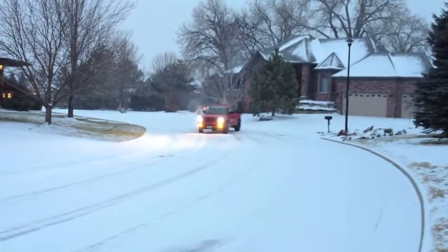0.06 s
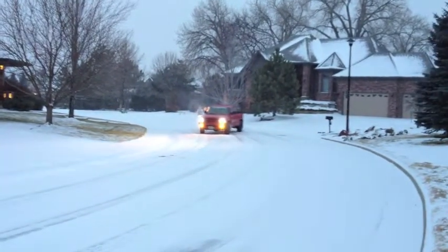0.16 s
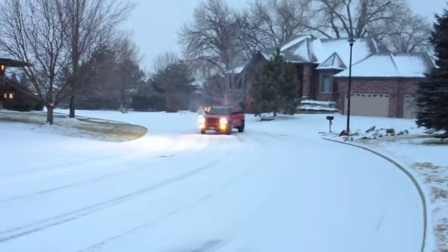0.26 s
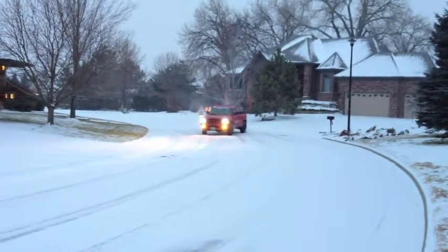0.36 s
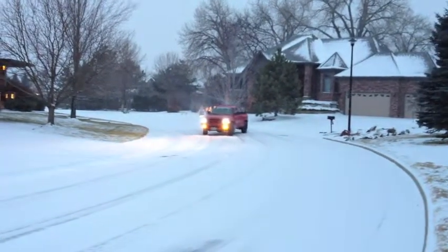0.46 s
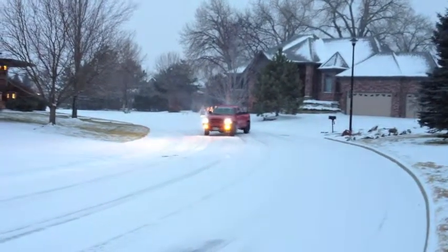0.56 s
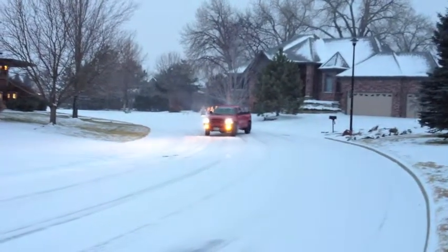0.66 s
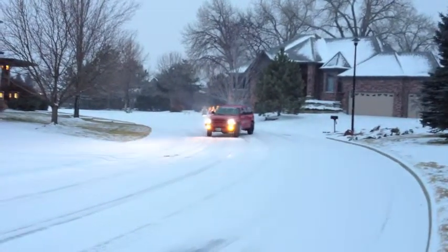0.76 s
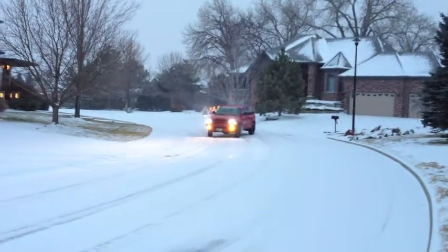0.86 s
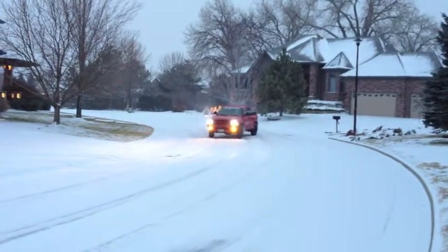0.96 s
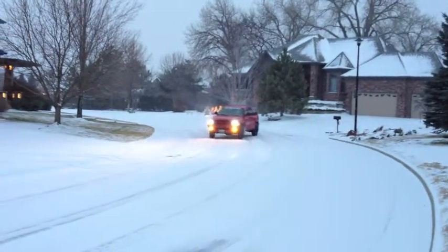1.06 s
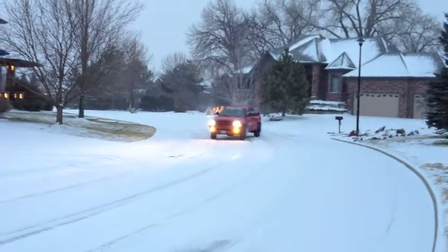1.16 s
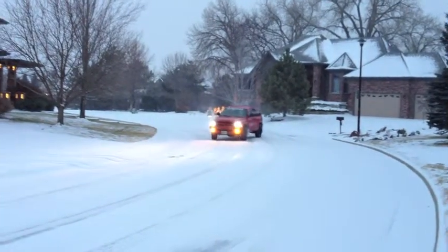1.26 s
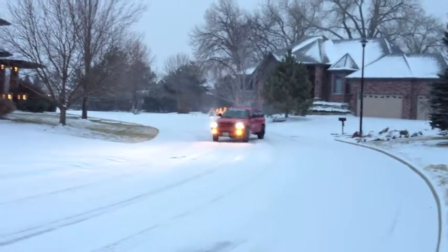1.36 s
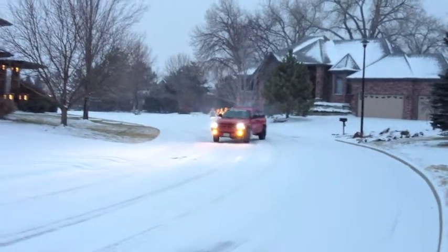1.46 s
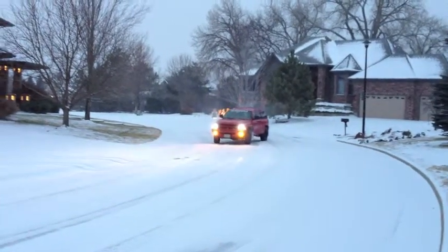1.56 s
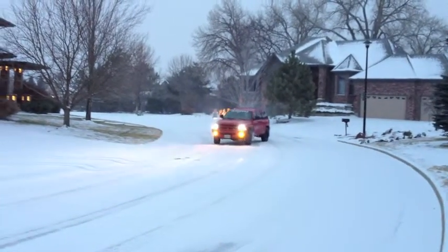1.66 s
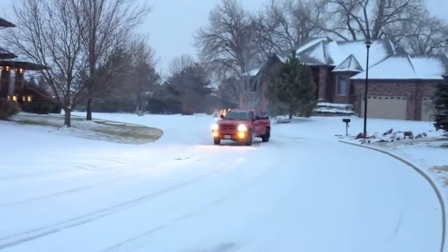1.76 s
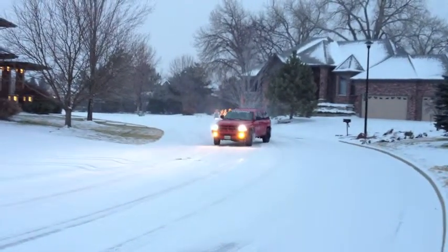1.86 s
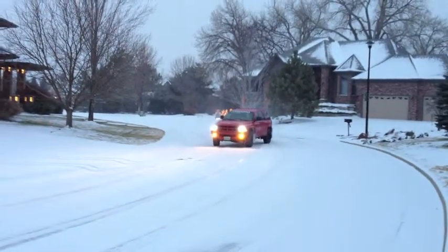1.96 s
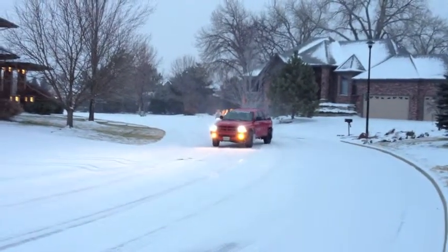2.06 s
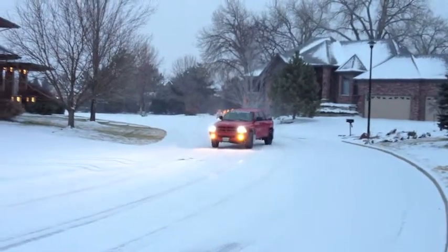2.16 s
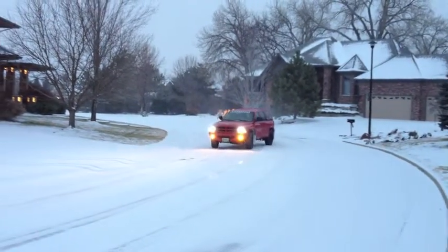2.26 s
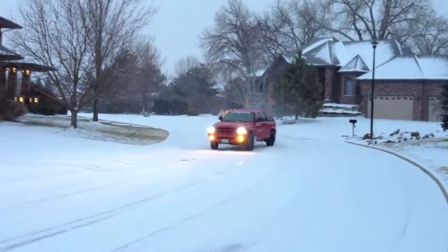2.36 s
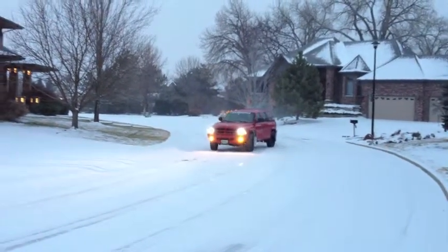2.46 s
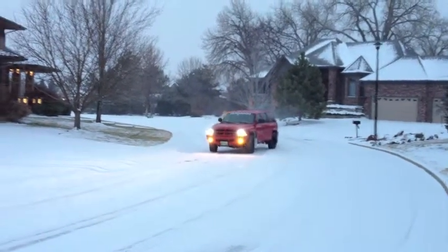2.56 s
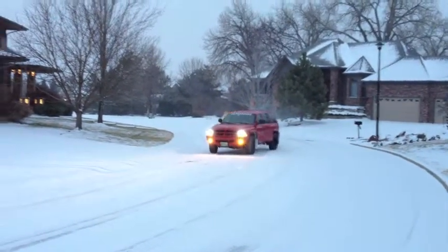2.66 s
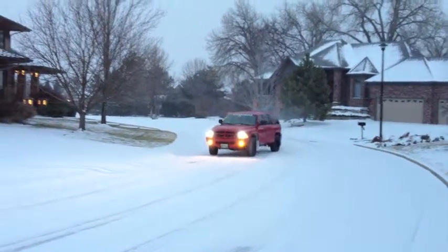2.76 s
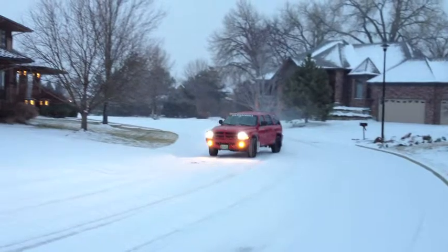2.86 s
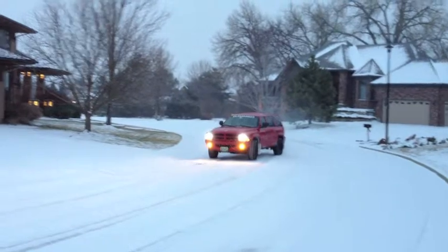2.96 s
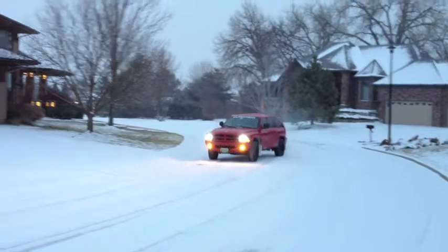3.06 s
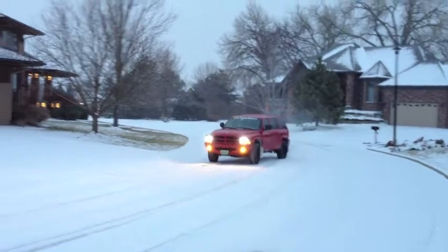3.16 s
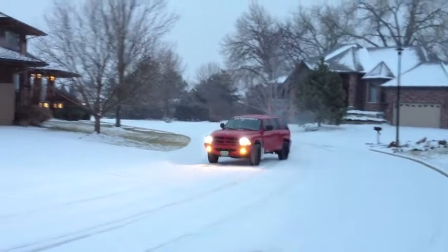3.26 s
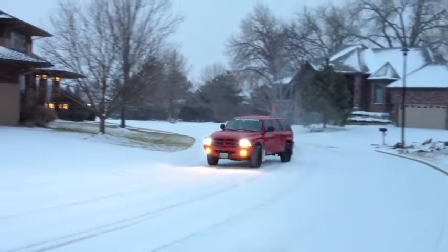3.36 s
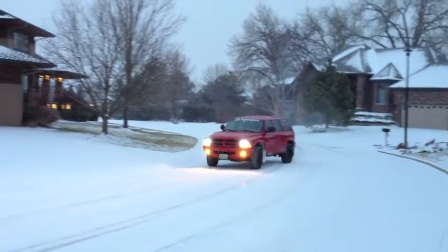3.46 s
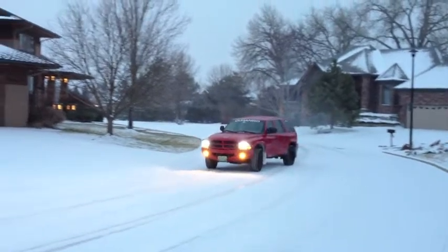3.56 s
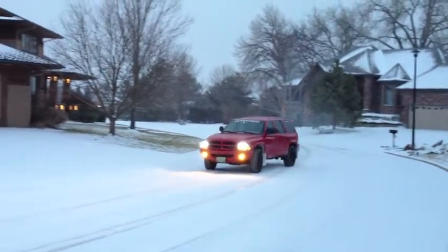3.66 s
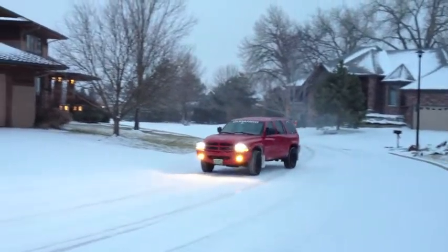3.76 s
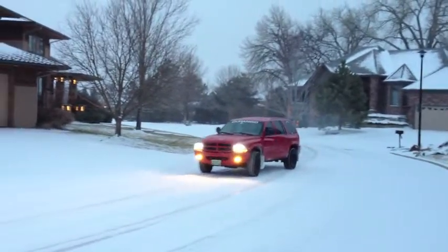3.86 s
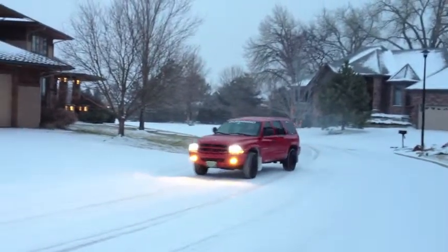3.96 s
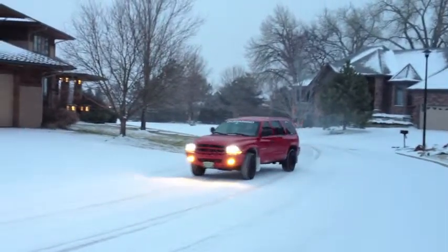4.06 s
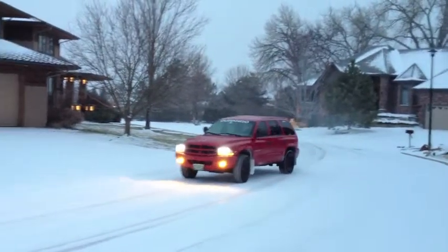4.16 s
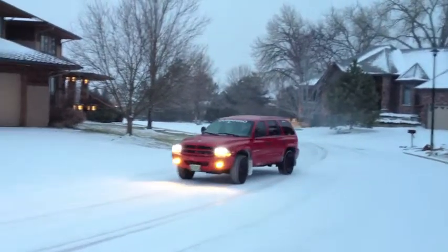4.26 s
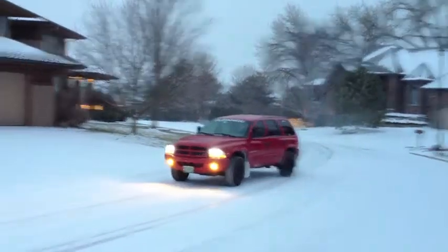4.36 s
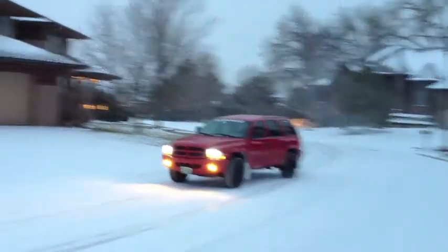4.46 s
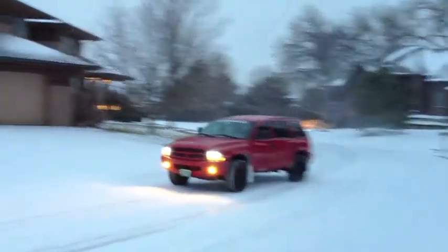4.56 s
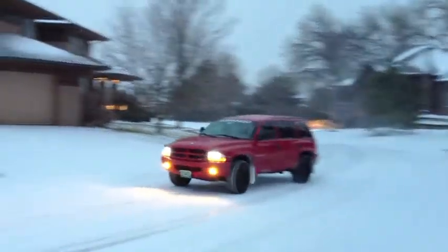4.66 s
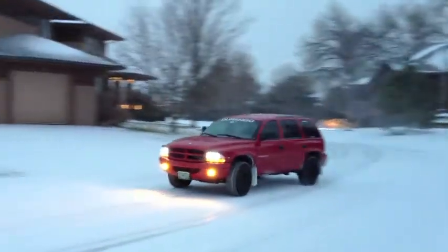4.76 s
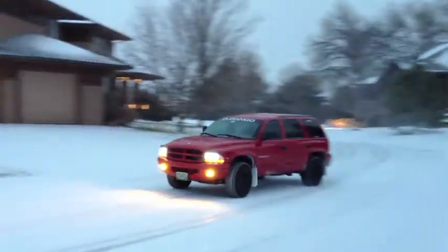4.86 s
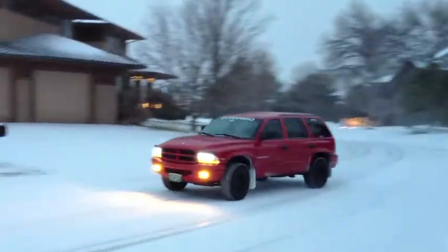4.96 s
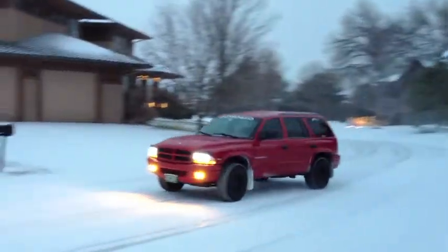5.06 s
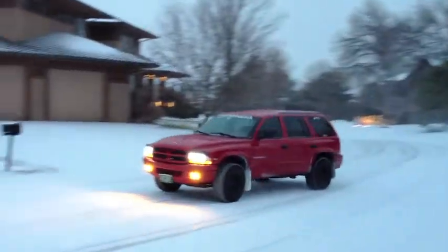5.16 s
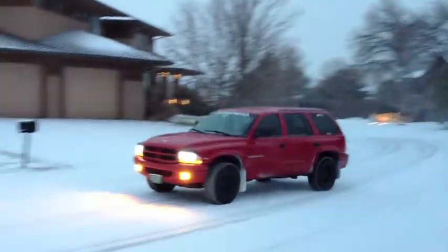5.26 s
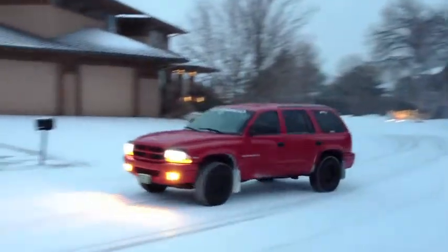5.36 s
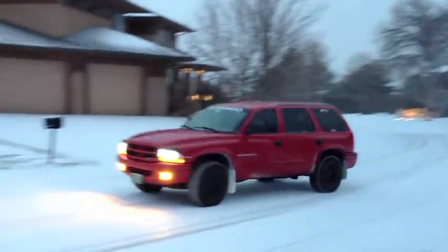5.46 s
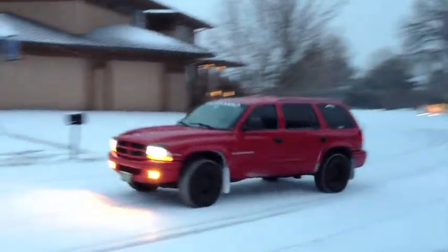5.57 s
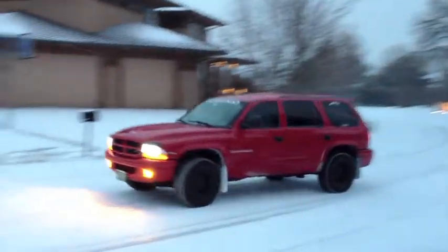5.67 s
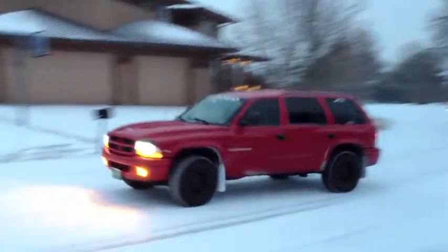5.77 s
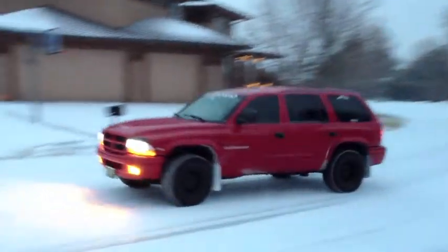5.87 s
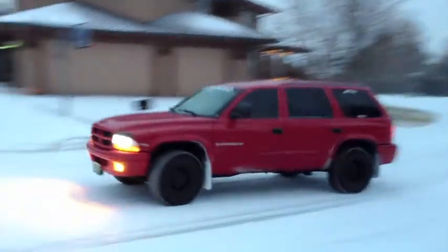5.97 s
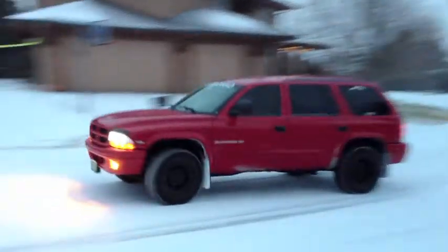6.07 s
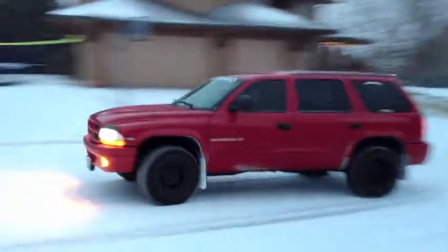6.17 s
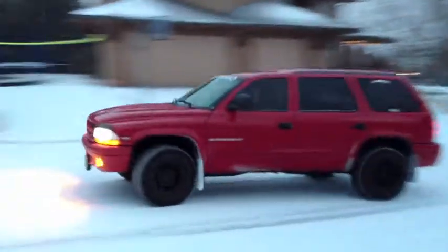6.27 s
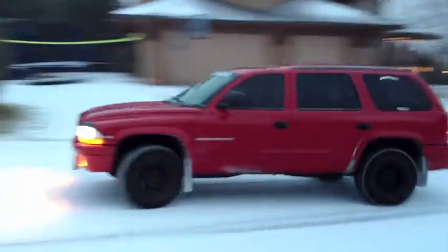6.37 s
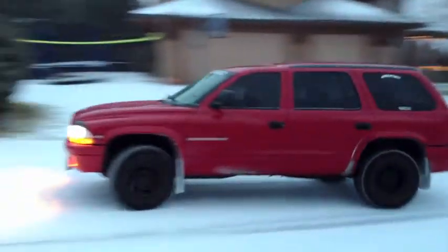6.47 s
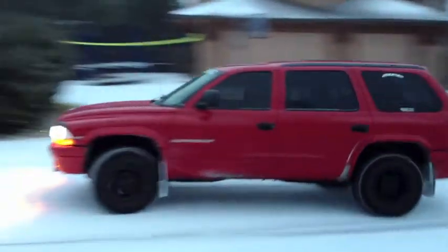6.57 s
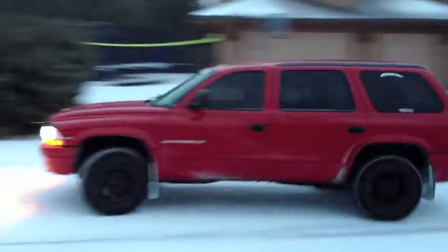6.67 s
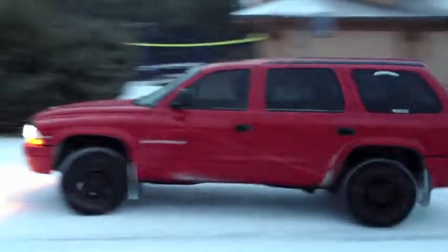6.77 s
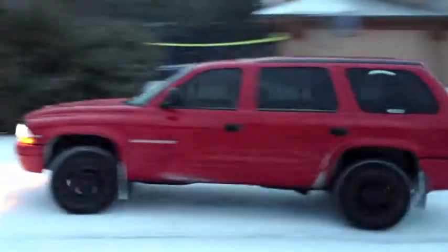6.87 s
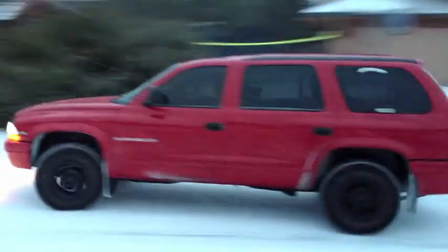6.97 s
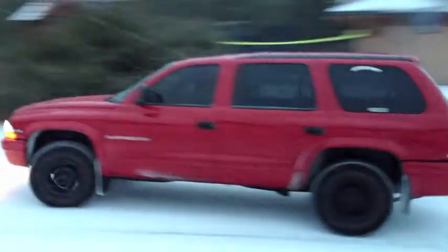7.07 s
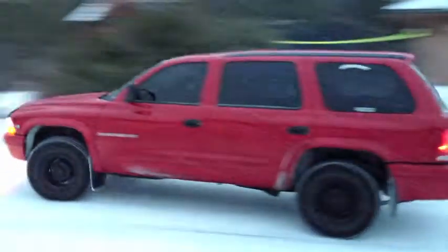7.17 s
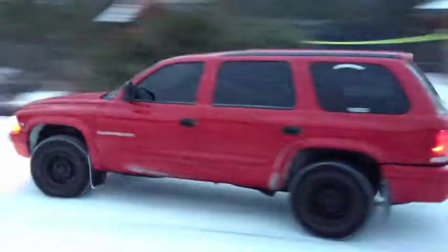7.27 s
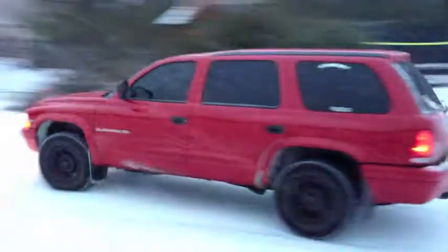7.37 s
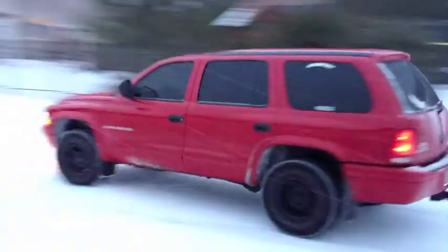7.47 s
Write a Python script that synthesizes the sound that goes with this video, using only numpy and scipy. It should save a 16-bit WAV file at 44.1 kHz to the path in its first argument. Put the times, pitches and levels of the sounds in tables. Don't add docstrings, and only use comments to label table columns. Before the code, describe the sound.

Outdoors on a quiet snowy street, a deep V8 rumble idles in from afar, single notes fading in and out off house fronts. It grows steadily, revs barely changing, as snow crunches and hisses beneath the tyres. At closest range the exhaust becomes rough, thick and lumpy with short sliding surges, slightly saturating the small handheld microphone, and it is still loud at the cut.

```python
import sys
import numpy as np
from scipy import signal
from scipy.io import wavfile

SR = 44100
rng = np.random.default_rng(int(sys.argv[2]) if len(sys.argv) > 2 else 0)


def pcm_store(signal):
    levels = np.round(np.clip(np.atleast_2d(signal), -1, 1) * 32767)
    wavfile.write(sys.argv[1], SR, levels.astype(np.int16).T)


def how_loud(loudness_db):
    steps = np.asarray(loudness_db, float) / 20
    return 10 ** steps


N = 332073
STEP = 32

# time_s, near_share (0-1)
NEARNESS = [(0, 0.1), (3.2, 0.12), (5, 0.51), (6.2, .95), (7.53, 0.94)]
# time_s, wheels_gain_db (wheels and bonnet come near), tailpipe_gain_db (it swings into view)
PASSING = [(0.0, 0, -0.5), (0.3, -0.8, 1.5), (0.9, -0.7, 0.5), (1.5, 2, 0.5), (2.2, 2, 1), (2.7, 3.5, 3),
           (3.1, 6.4, 0.5), (3.5, 7, 5), (3.8, 9, 9), (4.1, 10, 7.5), (5.1, 11, 8.5), (5.7, 13, 12),
           (5.95, 15, 14.5), (6.4, 17, 14.5), (6.65, 17.5, 19.5), (6.9, 17, 24), (7.3, 17, 25.5),
           (7.53, 16.5, 24)]


def rms_one(x):
    return x / np.sqrt(np.mean(x ** 2) + 1e-20)


def in_time(rows):
    time_s, *columns = np.transpose(rows)
    return [np.interp(np.arange(N) / SR, time_s, column) for column in columns]


def fine(slow):
    return np.interp(np.arange(N) / STEP, np.arange(len(slow)), slow)


def away(s, width):
    return (np.arange(0, N + STEP, STEP) / SR - s) / max(width, 1e-3)


def drift(rate):
    pole = np.exp(-2 * np.pi * STEP * rate / SR)
    settle = 2000
    noise = rng.standard_normal(N // STEP + settle + 2)
    slow = signal.lfilter([1], [1, -2 * pole, pole * pole], noise)
    return rms_one(slow[settle:])


def flicker(spread_db, rate):
    return fine(how_loud(spread_db * drift(rate)))


def resonate(x, hz, width_hz):
    radius = np.exp(-np.pi * width_hz / SR)
    gain = (1 - radius * radius) / 2
    section = [gain, 0, -gain, 1, -2 * radius * np.cos(2 * np.pi * hz / SR), radius * radius]
    return signal.sosfilt([section] * 2, x)


def body(x, modes, patchy_db, rate):
    rings = []
    for k, (hz, width_hz, *_) in enumerate(modes):
        sign = (-1) ** k
        rings.append(sign * flicker(patchy_db, rate) * resonate(x, hz, 1.47 * width_hz))
    far_db, near_db = np.transpose(modes)[2:]
    far = rms_one(how_loud(far_db) @ np.array(rings))
    near = rms_one(how_loud(near_db) @ np.array(rings))
    share = np.clip(in_time(NEARNESS)[0], 0, 1)
    return (1 - share) * far + share * near


def layers():
    # far_db, wheels_share, tailpipe_share (shares of the two passing gains)
    mix = [
        (-40.5, 0.51, 0.0076),
        (-49.5, 1.074, 0.078),
        (-55.5, 0.036, 1.15),
        (-47, 0.035, 1.04),
        (-52, .3, 0.66),
        (-54, 0.49, 0.29),
        (-68, 1.11, 0.027),
        (-65.5, .9, -0.14),
        (-67.5, 1.067, -0.097),
    ]
    # far_db, wheels_share, tailpipe_share
    lope = (-55.5, 1.9, -.45)
    # far_db, wheels_share, tailpipe_share
    twelfth = (-51, 0.12, .1)
    wheels_db, tailpipe_db = in_time(PASSING)
    return [far_db + wheels * wheels_db + tail * tailpipe_db for far_db, wheels, tail in mix + [lope, twelfth]]


def tones(firings, levels_db):
    orders = [(8, 0, 0.5, 0.6), (13, 2, -0.8, 0.6), (16, 1, .4, .9), (5, 2, -18, 2), (7, 0, -16, 2.5),
              (15, 4, -.5, 1.0), (14, 4, -12, 2), (18, 4, -11, 3), (23, 4, -13, 3), (9, 1, -22, 3.5),
              (24, 5, -0.2, 1.5), (21, 3, 0.7, -0.7), (22, 2, -10, 1.5)]
    strong_firing_s = 6.345
    scatter_rad, pipe_lag_rad = 0.7, 1.0
    cycle = 2 * np.pi * (firings - firings[round(strong_firing_s * SR)]) / 8
    gains = how_loud(np.array(levels_db))
    out = np.zeros(N)
    for order, curve, db, wander_db in orders:
        phase = scatter_rad * rng.uniform(-1.2, 1) - pipe_lag_rad
        level = np.sqrt(2) * how_loud(db) * gains[round(curve)] * flicker(wander_db, 3.0)
        out += level * np.cos(round(order) * cycle + phase)
    return out


def faded(levels_db):
    # time_s, curve (index in levels_db, rounded), half_width_s, left_db
    notches = [(.92, 3, 0.044, -12), (1.26, -0.5, .07, -6.5), (6.933, 3, 0.2, -6.5), (3.1, 0, 0.074, -6),
               (3.459, 0, .12, -16), (3.87, 0, 0.14, -14.5), (4.38, 0, .12, -20), (4.94, 0, .16, -23),
               (5.17, 0, 0.11, -27), (1.59, 0, .04, -9), (6.76, -0.5, 0.084, -3.5),
               (7.38, -0.5, 0.037, -11), (.2, 5, .5, -8.5), (1.14, 1, 0.17, -4), (1.68, 2, 0.13, -11),
               (2.73, 1, 0.16, -5.5), (3.14, 1, .1, -9), (3.948, 1, 0.56, -6), (4.604, 1.5, .2, -2.5),
               (5.62, 1, 0.26, -5), (6.84, 1, .5, -5), (7.508, 1.5, .25, -14.5), (.77, 2, 0.21, -6),
               (2.702, 2, 0.34, -8), (6.62, 2, 0.12, -1.5), (6.92, 2, .08, -3), (5.03, 3, .12, -10.5),
               (6.254, 3, 0.28, -10), (3.75, 3, .2, -6.5), (5.653, 3, 0.34, -9.5)]
    loss_db = np.zeros((len(levels_db), len(away(0, 1))))
    for s, curve, width, left_db in notches:
        left = min(how_loud(left_db), 1)
        power = left ** 2 + (1 - left ** 2) * np.tanh(away(s, width)) ** 2
        loss_db[round(curve)] += 10 * np.log10(power)
    return [db + fine(loss) for db, loss in zip(levels_db, loss_db)]


def uneven(firings):
    at = np.flatnonzero(np.diff(np.floor(firings)) > 0)
    kicks = np.zeros(N)
    kicks[at] = rng.standard_normal(len(at))
    return rms_one(kicks)


def puffs(firings, puffs_db):
    # centre_hz, width_hz, far_db, near_db
    pipe_modes = [(77.7, 22, -0.5, -6), (92, 28.4, 0.5, -0.1), (127.5, 30.4, -1, -8),
                  (157.6, 24.8, -4.5, -3), (191.8, 28, -7, -9), (222, 34, -18, -13.5)]
    drive = uneven(firings) + 0.69 * rng.standard_normal(N)
    burble = body(drive, pipe_modes, patchy_db=1.5, rate=4.0)
    return how_loud(puffs_db - 1.2 * in_time(NEARNESS)[0]) * burble


def surges():
    # middle_s, peak_db, from_hz, to_hz, length_s
    glides = [(3.72, -26, 137, 105, .07), (4.21, -33, 187, 170.1, 0.062), (4.4, -42, 365.6, 360.6, 1.2),
              (5.03, -37.5, 300, 300, 0.17), (6.52, -27.5, 239.8, 223, 0.062),
              (6.745, -18.5, 181, 169.7, .06), (6.82, -13, 119, 92, .1), (7.01, -27, 353.7, 370, 0.11),
              (7.13, -15, 151, 120, 0.057), (7.13, -20, 250, 230, .035), (7.37, -13.5, 75.4, 106, .15),
              (7.375, -21.5, 240, 217, .12)]
    out = np.zeros(N)
    for s, peak_db, from_hz, to_hz, length_s in glides:
        size = round(length_s * SR)
        turns = np.cumsum(np.linspace(from_hz, to_hz, size)) / SR
        note = np.sin(2 * np.pi * turns + rng.uniform(0, 2 * np.pi))
        out[round(s * SR) - size // 2:][:size] += how_loud(peak_db) * np.hanning(size) * note
    return out


def bay(firings, drone_db, roar_db):
    # centre_hz, width_hz, far_db, near_db
    drone_modes = [(250, 45, -4, -6), (300, 28.5, 0.3, 0.2), (330.6, 30, 0, -3), (372.4, 37, -0.9, 1.1),
                   (432, 65, -5, -4), (504, 70, -9, -7.5), (586, 78, -13, -12)]
    roar_modes = [(651, 110, 0.2, -6.5), (804, 170, -1.6, 0.4), (960, 170, -4.5, -1.5), (1101, 138, 2, 0.8),
                  (1256, 178, -8, -2.5), (1491, 222, -7.5, -5.5)]
    breath = 1 + 0.048 * np.cos(2 * np.pi * firings)
    drone_drive = breath * rng.standard_normal(N) + 0.55 * uneven(firings)
    drone = body(drone_drive, drone_modes, patchy_db=0.82, rate=3.0)
    roar = body(breath * rng.standard_normal(N), roar_modes, patchy_db=1.14, rate=4.6)
    return how_loud(drone_db) * drone + how_loud(roar_db) * roar


def grains(per_s, spread_db, smooth):
    sizes = how_loud(spread_db * np.minimum(rng.exponential(1, N), 4)) * rng.choice([-1, 1], N)
    clicks = sizes * (rng.random(N) < per_s / SR)
    return rms_one(clicks) + smooth * rng.standard_normal(N)


def snow(tread_db, crunch_db, powder_db):
    # centre_hz, width_hz, far_db, near_db
    tread_modes = [(1714, 240, -0.8, 0.2), (2020, 200, -7.5, 1.5), (2230, 130, 3, -1.5),
                   (2450, 250, -9, -5)]
    crunch_modes = [(2708, 180, 0, -3), (2977, 260, 0.7, 0.6), (3307, 280, -6, -0.5)]
    powder_modes = [(3566, 300, -3, 1.6), (4097, 260, -1.5, -0.5), (4420, 250, -9.5, -2),
                    (4875, 450, 1.1, -1), (5440, 500, -4, -2.5), (6030, 590, -0.5, 0.1),
                    (6840, 700, -4.5, -7.5), (7500, 450, -8, -10.5)]
    # time_s, extra_db
    packing = [(.14, 5), (0.769, 5), (.9, 3), (1.05, 4), (1.17, 2), (1.55, 1), (1.64, 3.5), (1.82, 3.5),
               (2.45, 2), (2.87, 8), (2.98, 6), (3.25, 7.5), (3.52, 7.5), (3.67, 6), (3.77, 7), (3.92, 4),
               (4.03, 3.5), (5.09, 3), (5.41, 5), (5.62, 4.5), (6.19, -1.5), (6.29, 2.5), (6.38, 2.5),
               (6.56, 1), (6.635, 4.5), (6.7, 6), (6.8, 3.5), (7.3, 5), (7.49, 4.5)]
    patch_s = 0.023
    spray_from_s, spray_to_s, spray_edge_s, spray_db = 6.585, 6.825, 0.012, 4.0

    clumps = flicker(0.8, 14.0)
    crunch = body(clumps * grains(1200, 3.4, smooth=1.5), crunch_modes, patchy_db=1.0, rate=20.0)
    powder = body(clumps * grains(3000, 2.2, smooth=1.3), powder_modes, patchy_db=0.5, rate=7.4)
    tread = body(clumps * grains(2000, 3.0, smooth=1.6), tread_modes, patchy_db=0.76, rate=8.9)
    patches_db = sum(db * np.exp(-away(s, patch_s) ** 2) for s, db in packing)
    spray = (np.tanh(away(spray_from_s, spray_edge_s)) - np.tanh(away(spray_to_s, spray_edge_s))) / 2
    out = how_loud(crunch_db + fine(patches_db)) * crunch
    out += how_loud(powder_db + spray_db * fine(spray)) * powder
    return out + how_loud(tread_db - 0.73) * tread


def squeak():
    # time_s, peak_db, half_length_s
    patches = [(2.86, -76, .03), (2.99, -72, .05), (3.11, -69, 0.078), (3.26, -65, .045), (3.41, -65, .045),
               (3.518, -69, .06), (3.6, -74, .05), (3.76, -74, .05)]
    band = rms_one(resonate(rng.standard_normal(N), 4120, 160))
    swell = sum(how_loud(db) * np.exp(-away(s, half_s) ** 2) for s, db, half_s in patches)
    return band * flicker(3.0, 40.0) * fine(swell)


def ticks():
    # time_s, peak_db, centre_hz, width_hz
    snaps = [(0.029, -39, 4300, 3500), (0.0344, -43.5, 5800, 3000), (1.9812, -41, 3000, 1420),
             (2.2140, -40.5, 2900, 3007), (2.215, -44, 1900, 400), (2.2216, -48, 7200, 1180),
             (5.803, -31, 6400, 2780), (6.5602, -21, 3200, 5000), (6.6184, -31, 2100, 900),
             (6.6790, -28, 2200, 1000), (6.68, -32, 5900, 1200), (6.591, -38, 3100, 500),
             (6.626, -35, 3100, 500)]
    out = np.zeros(N)
    for s, peak_db, hz, width_hz in snaps:
        snap = resonate(signal.unit_impulse(400), hz, width_hz)
        out[round(s * SR):][:400] -= how_loud(peak_db) * snap / np.abs(snap).max()
    return out


def rumble():
    hum = rms_one(resonate(rng.standard_normal(N), 50, 22))
    return how_loud(-56 + 0.55 * in_time(PASSING)[1]) * hum


def scene():
    # time_s, firing_rate_hz
    speed = [(0.0, 64.5), (0.6, 59.7), (0.95, 59.0), (1.5, 59.4), (2.1, 60.3), (2.7, 62.2), (3.2, 63.4),
             (3.85, 65.5), (4.15, 65.4), (4.4, 66.7), (4.9, 67.1), (5.4, 66.4), (5.7, 66.8), (6.3, 65.9),
             (6.8, 67.3), (7.3, 68.9), (7.53, 68.0)]
    # time_s, level_db
    engine = [(0.0, -44), (0.17, -38), (0.45, -40.5), (0.77, -45), (1.5, -42.5), (2.0, -41), (2.3, -35.5),
              (2.8, -38.5), (3.15, -36), (3.7, -32.5), (4.2, -26.5), (4.6, -27), (5.1, -29), (5.4, -25),
              (6.0, -21.5), (6.6, -22), (7.25, -21), (7.53, -27.5)]
    (rate,), (firing_db,) = in_time(speed), in_time(engine)
    octave, burble, boom, puff, drone, roar, tread, crunch, powder, lope, twelfth = layers()
    firings = np.cumsum(rate) / SR

    lumps = 0.93 * in_time(NEARNESS)[0] ** 2 * fine(drift(9.0))
    blast_s, blast_half_s, blast_db = 7.355, 0.08, 3
    blast = fine(blast_db * np.exp(-away(blast_s, blast_half_s) ** 2))

    notes = tones(firings, faded([firing_db, octave, burble, boom, lope, twelfth]))
    exhaust = notes + puffs(firings, puff + lumps) + surges()
    engine_bay = bay(firings, drone + lumps, roar + 0.36 * lumps + blast)
    tyres = snow(tread, crunch, powder) + squeak()
    return (exhaust + engine_bay + tyres + ticks() + rumble())[None]


def band_limit(x):
    return signal.sosfilt(signal.butter(12, 7850, fs=SR, output="sos"), x)


def record(dry):
    ceiling, cutoff_hz = 0.62, 7660
    rounded = ceiling * np.tanh(dry / ceiling)
    low_pass = signal.ellip(10, 0.5, 50, cutoff_hz, fs=SR, output="sos")
    return band_limit(signal.sosfilt(low_pass, rounded))


dry = scene()
out = record(dry)
pcm_store(out)
```